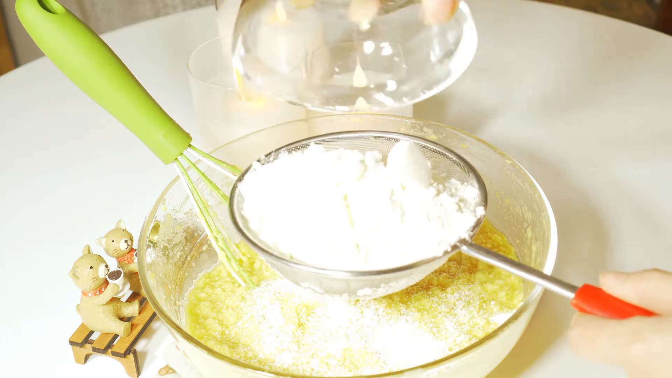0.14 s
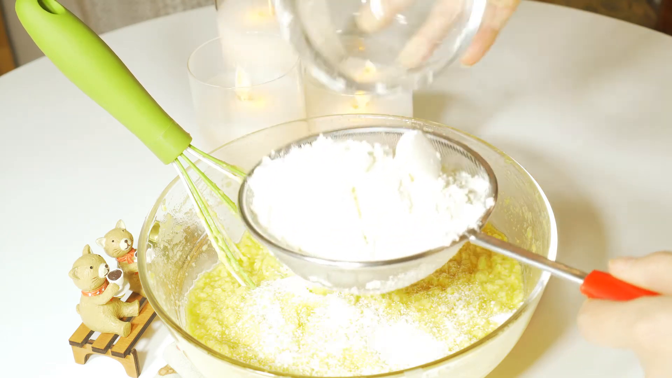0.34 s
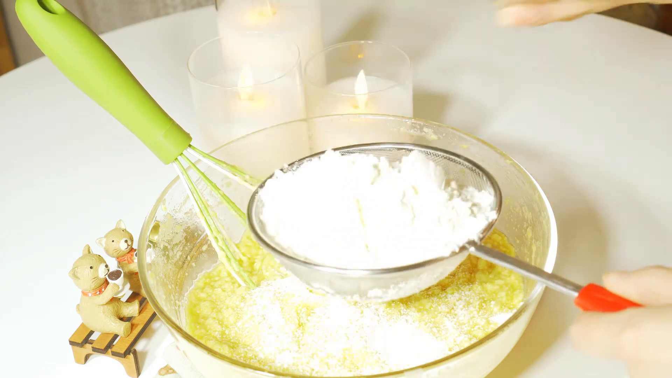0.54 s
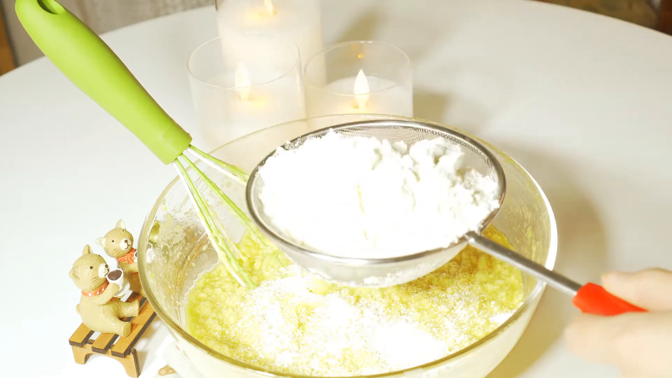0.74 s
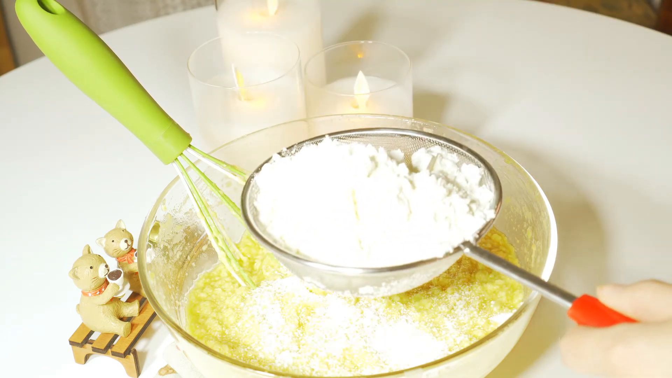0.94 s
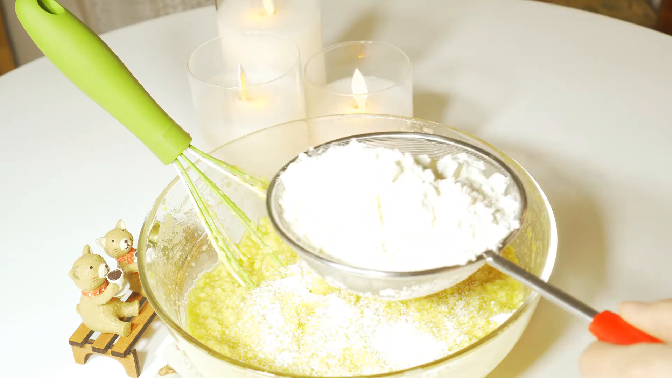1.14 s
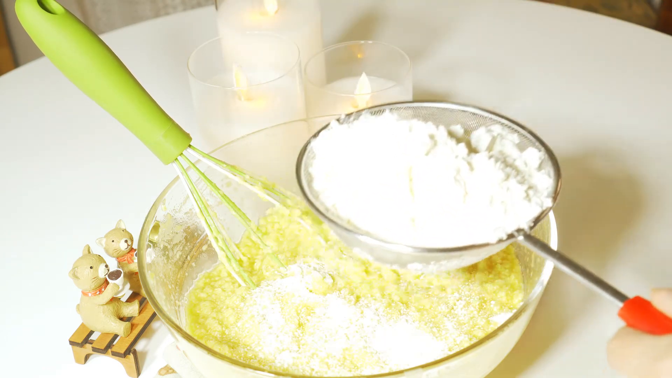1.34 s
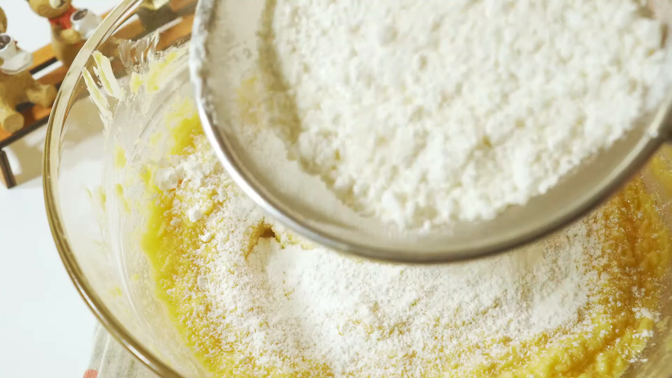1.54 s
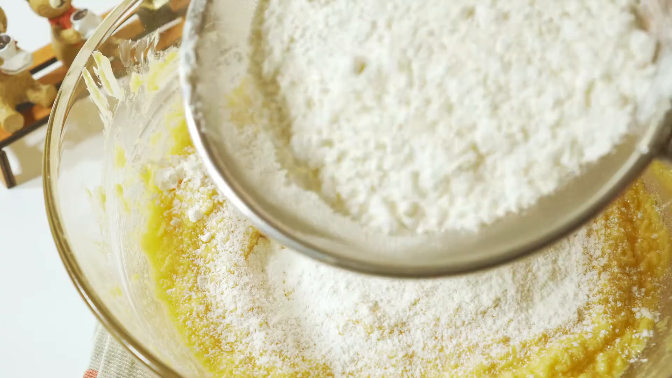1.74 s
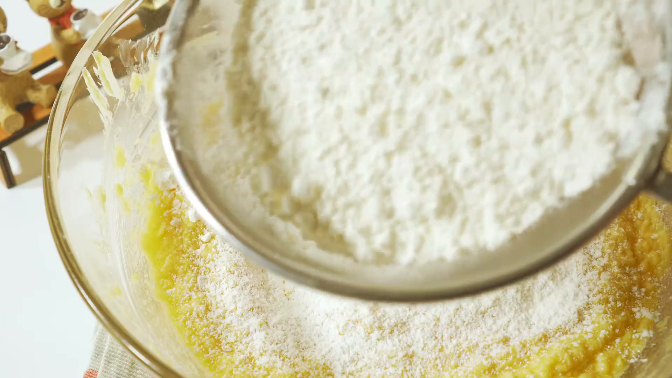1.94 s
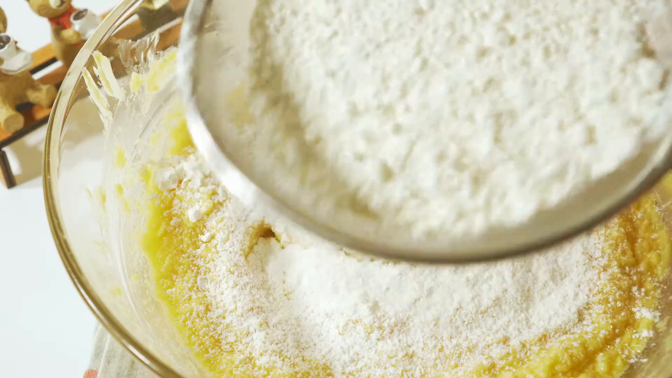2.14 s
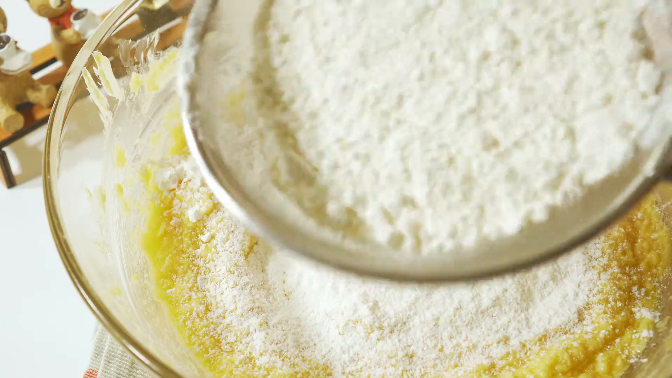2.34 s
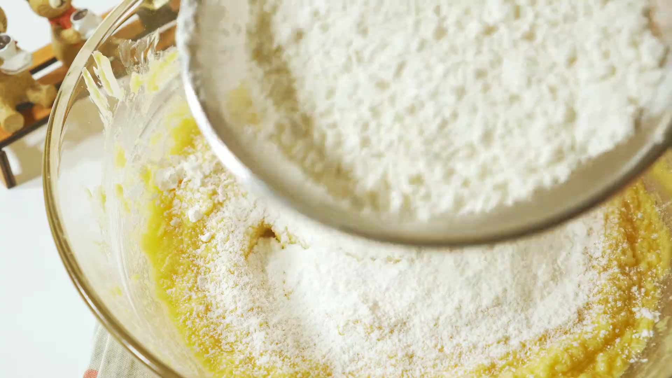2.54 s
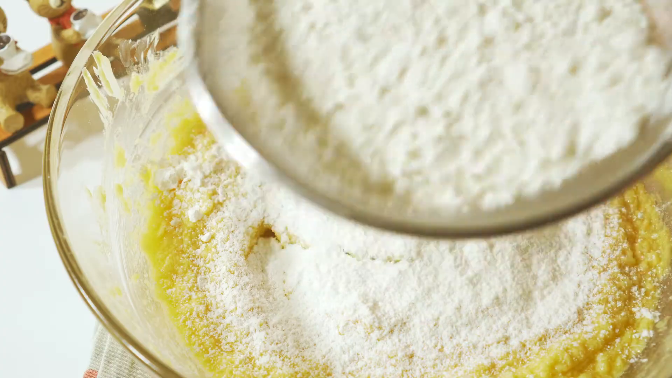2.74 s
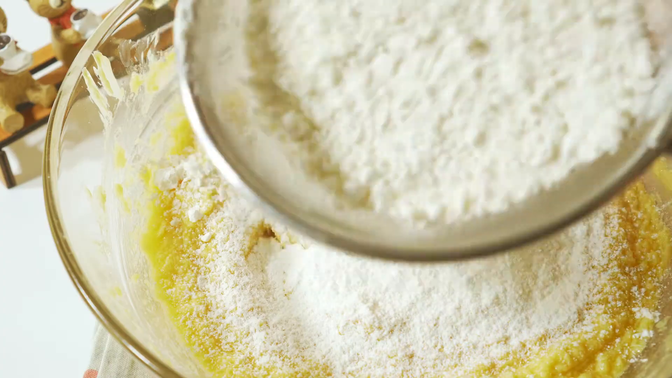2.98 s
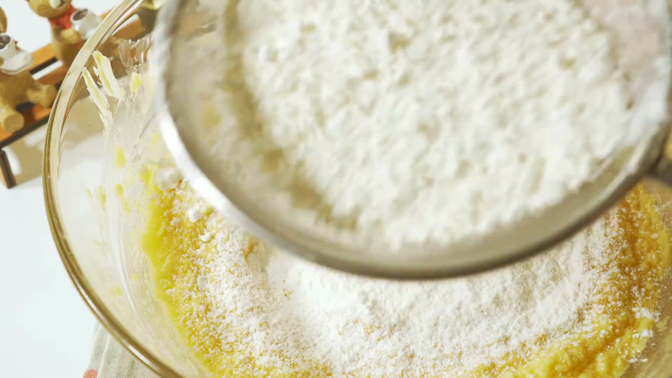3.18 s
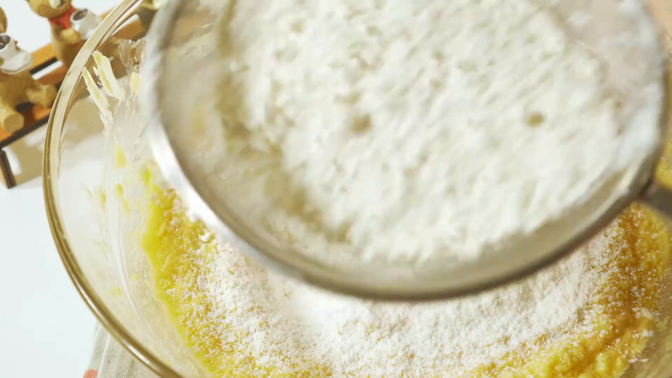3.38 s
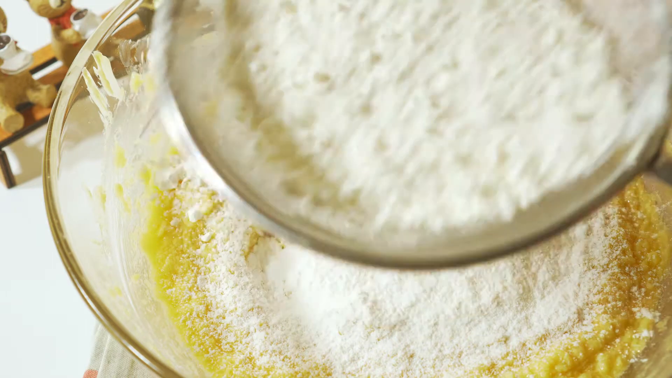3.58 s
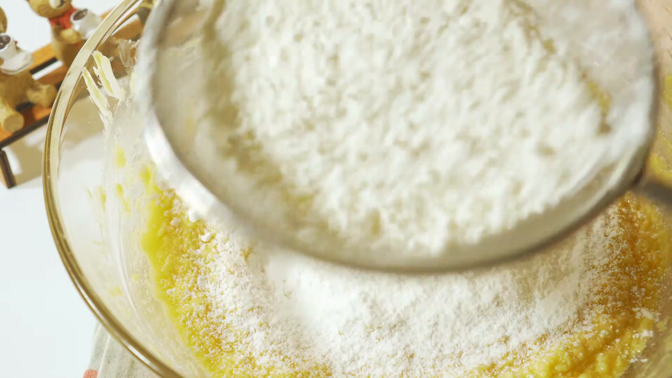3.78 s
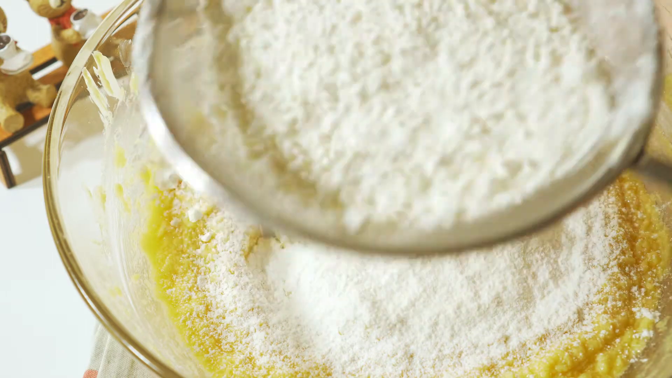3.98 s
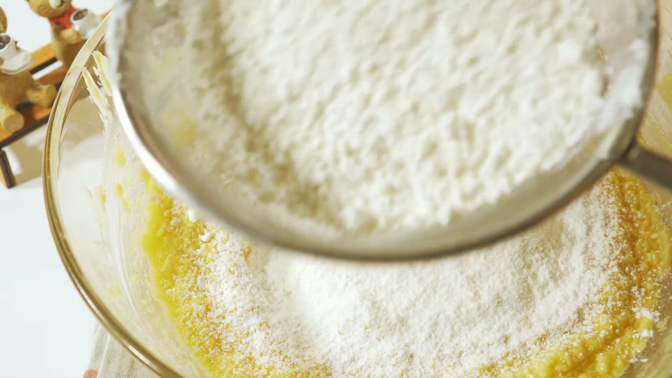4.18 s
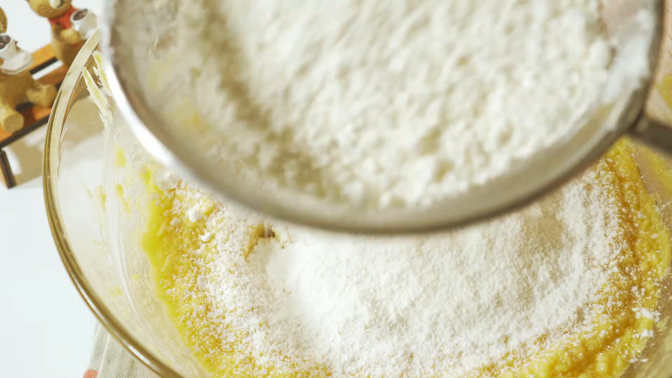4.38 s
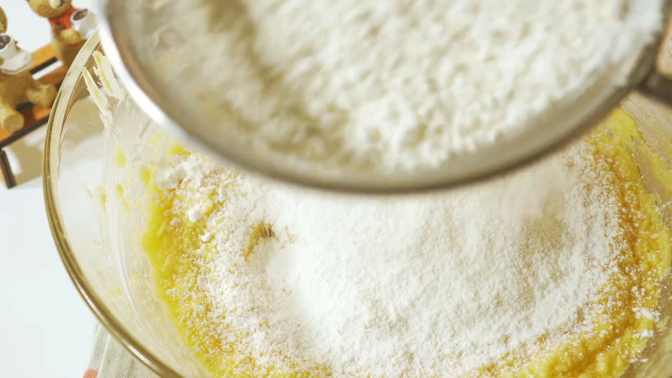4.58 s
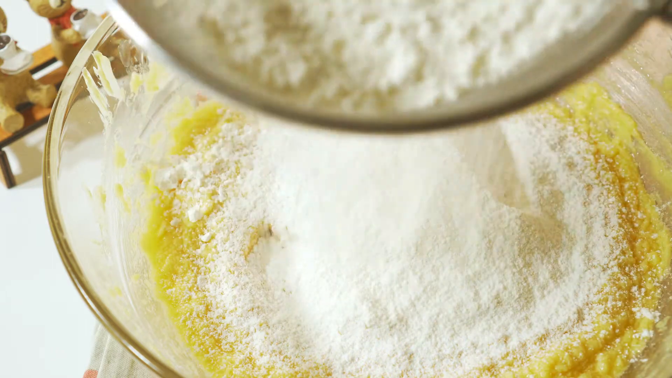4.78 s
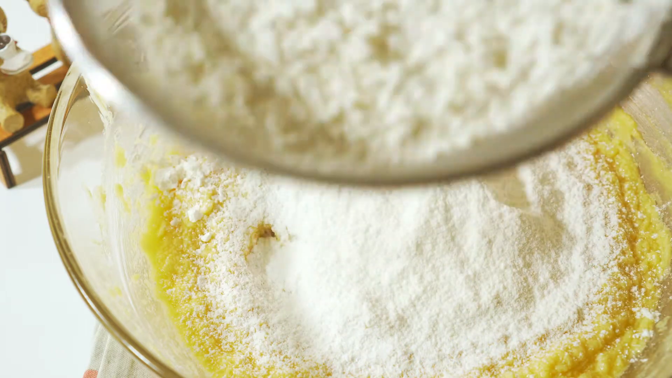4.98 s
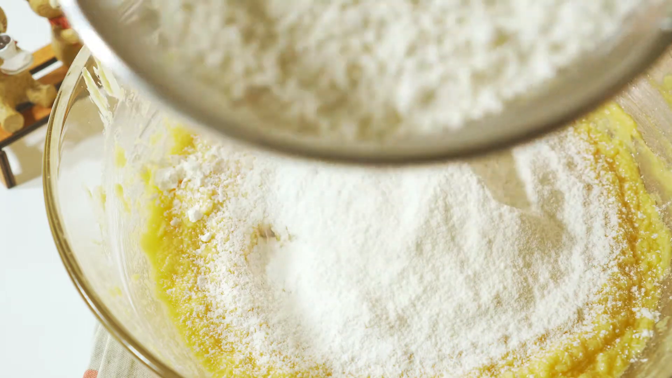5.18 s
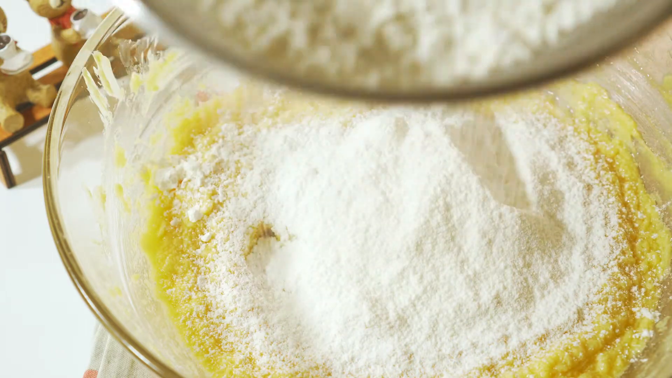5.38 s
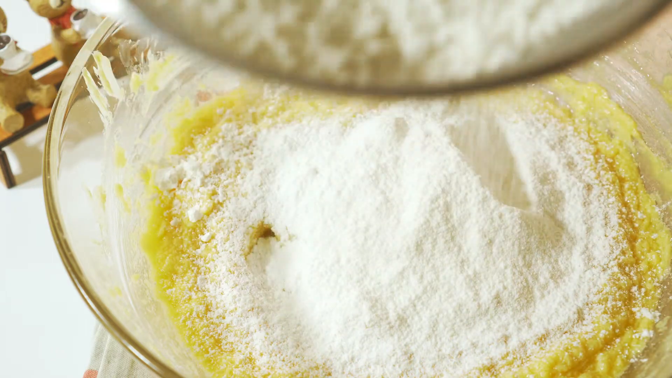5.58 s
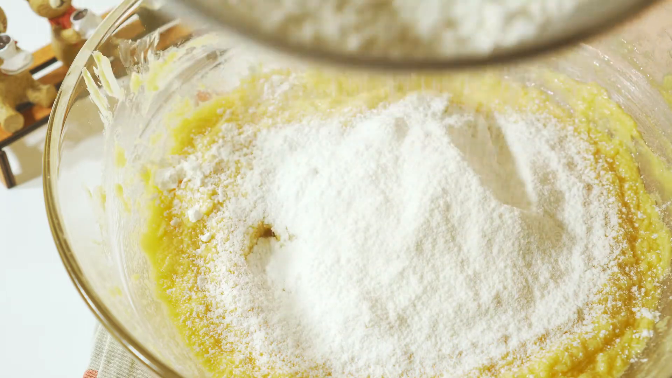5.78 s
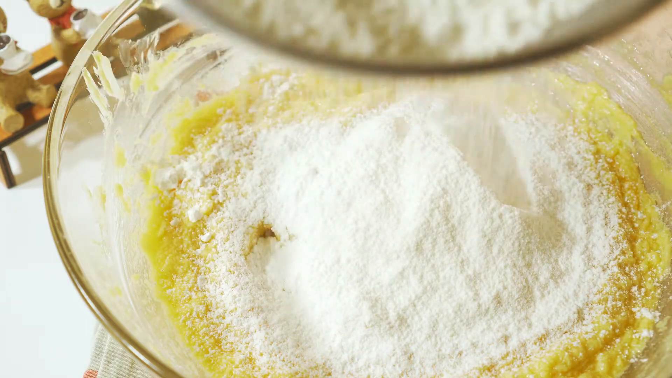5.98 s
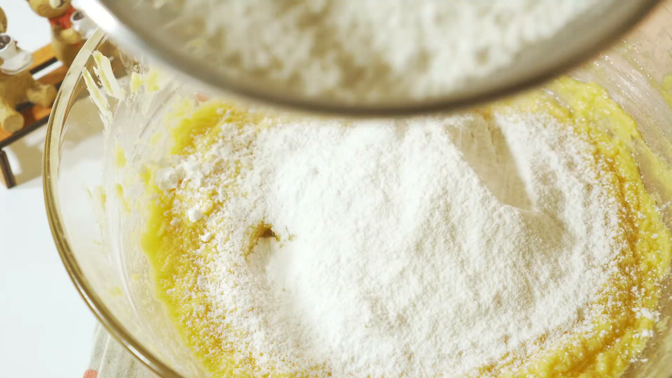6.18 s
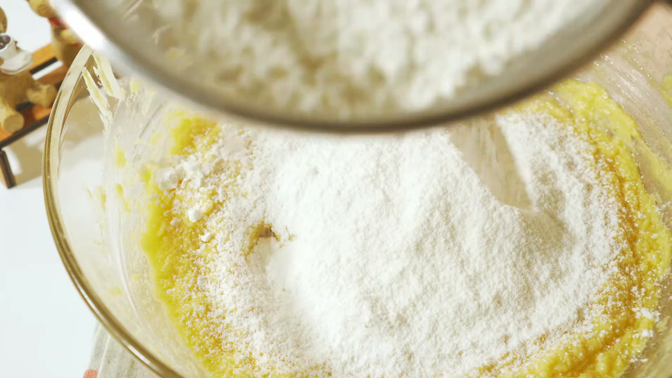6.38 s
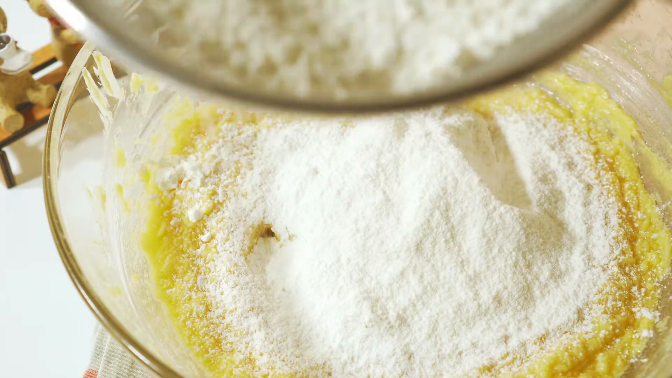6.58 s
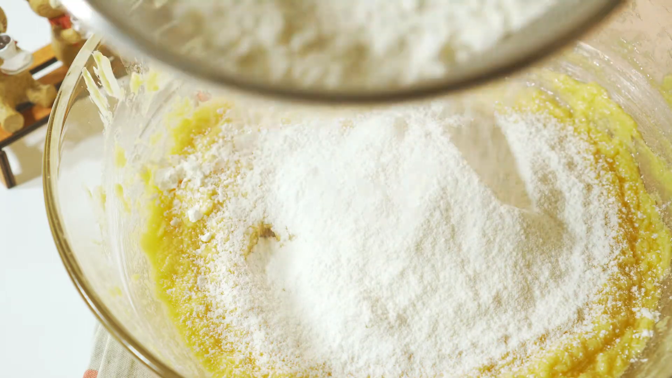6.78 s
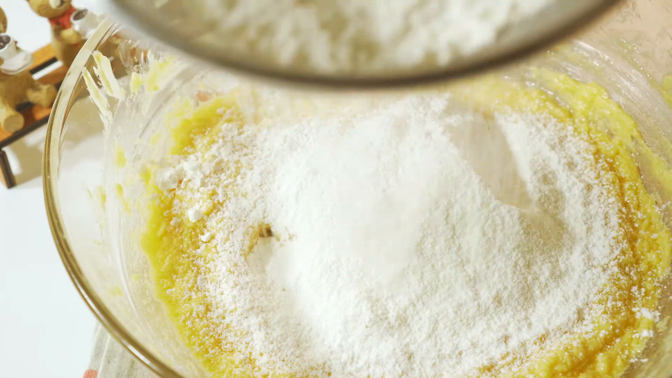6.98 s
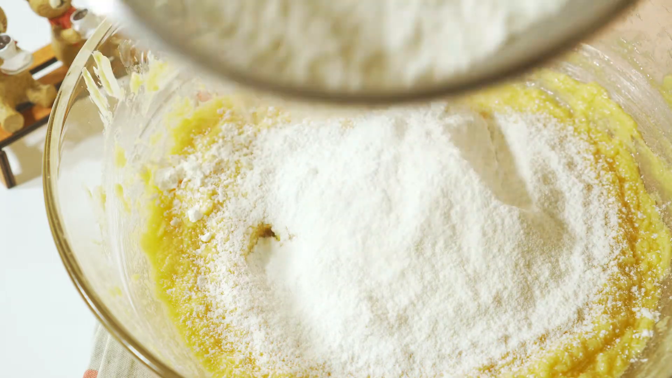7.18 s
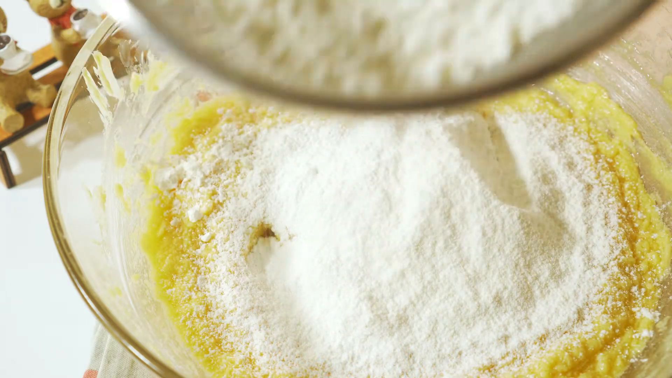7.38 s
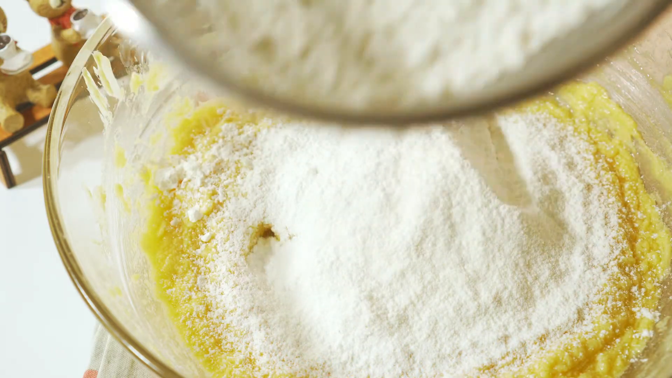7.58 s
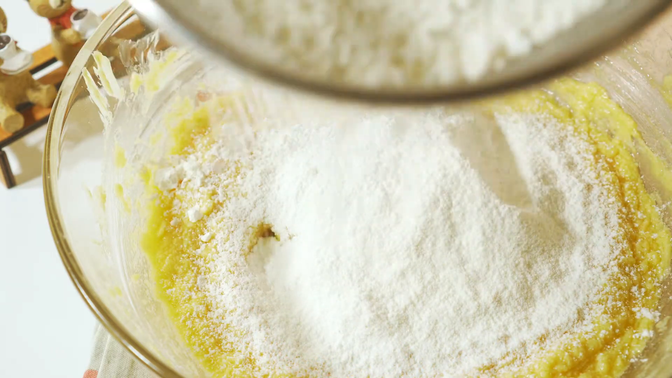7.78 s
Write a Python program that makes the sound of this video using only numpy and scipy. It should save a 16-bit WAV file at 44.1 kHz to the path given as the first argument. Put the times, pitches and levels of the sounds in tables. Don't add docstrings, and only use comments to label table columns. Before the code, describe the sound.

For a second and a half, a quiet kitchen: throbbing fridge compressor, small hand rustles, noticeable hiss. A brief silent cut with a tiny tick, then a palm taps a flour-laden metal sieve about five times a second to the end. Each tap is a dull low thud with a muffled rim knock and soft powdery puff. Very close microphone, strongly left, weak copy on the right.

```python
import sys
import numpy as np
from scipy import signal
from scipy.fft import rfft, irfft, next_fast_len
from scipy.io import wavfile
from scipy.ndimage import map_coordinates

SR = 44100
rng = np.random.default_rng(int(sys.argv[2]) if len(sys.argv) > 2 else 0)


def magnitude_from_level(level_db):
    exponent = np.asarray(level_db, float) / 20
    return 10 ** exponent


def put_to_file(sound):
    columns = np.atleast_2d(sound).T
    safe = np.clip(columns, -1, 1)
    whole_steps = np.round(safe * 32767)
    wavfile.write(sys.argv[1], SR, whole_steps.astype(np.int16))


N = 345303
T = np.arange(-3000, 3000) / SR
T_SHORT = T[1800:-1800]

# peak_s [s], thud_db
# [dB peak], thud_hz [Hz], puff_db [dB]
PALM_TAPS = [(1.5108, -11, 133, -38), (1.7119, -13, 104, -38), (1.8708, -10, 191, -38),
             (2.0573, -10.5, 114, -40.5), (2.226, -7.5, 135, -34), (2.4231, -5, 172, -36),
             (2.6156, -21.5, 80.4, -39), (2.806, -13.5, 172, -36), (3.0285, -26.5, 81, -38),
             (3.2289, -23.5, 106, -39.5), (3.4304, -6.5, 179, -40), (3.6356, -17, 91, -33.5),
             (3.8612, -9, 163, -35), (4.0691, -21.5, 77, -35.5), (4.2794, -18, 93.5, -33.5),
             (4.476, -5, 108, -32.5), (4.677, -5, 133, -33.5), (4.8839, -9.5, 150, -40),
             (5.0783, -8, 116, -35.5), (5.2598, -0.5, 158, -39), (5.4523, -5.5, 159, -42.5),
             (5.6691, -7.5, 98, -37.5), (5.8614, -10.5, 99, -35), (6.0618, -16, 116, -39.5),
             (6.2756, -13, 93, -38), (6.4845, -15.5, 107, -38.5), (6.6859, -11.5, 88.5, -34),
             (6.898, -9, 90, -35), (7.1032, -13.5, 85.5, -36), (7.3274, -17, 102, -35),
             (7.5377, -14.5, 79, -37), (7.7558, -11, 91, -32)]
ALL_TAPS = PALM_TAPS
# start_s [s], level_db [dB peak]
REBOUNDS = [(1.518, -9.5), (2.0621, -18), (2.2313, -4), (2.4306, -6.5), (2.6199, -27), (2.811, -14.5),
            (3.0297, -35), (3.2318, -29), (3.6391, -19.5), (4.072, -21), (4.2832, -17), (4.4802, -5.5),
            (4.6827, -13.5), (4.8864, -16), (5.0806, -4.5), (5.4622, -16), (6.075, -19), (6.4951, -19.5),
            (6.6873, -6.5), (6.9033, -5), (7.1067, -7.5), (7.3301, -8.5), (7.5396, -11.5), (7.7594, -6.5)]


def unit(x):
    return x / np.sqrt(np.mean(x ** 2) + 1e-20)


def curves(rows):
    s, *cols = np.transpose(rows)
    return np.array([np.interp(np.arange(N) / SR, s, c) for c in cols])


def shots(before, after):
    change_s = 1.475
    return np.where(np.arange(N) / SR < change_s, before, after)


def filtered(x, response):
    m = next_fast_len(N + 8192)
    spectrum = rfft(x, m) * response(np.fft.rfftfreq(m, 1 / SR))
    return irfft(spectrum, m)[..., :N]


def coloured(x, spectrum):
    f, db = np.transpose(spectrum)
    return unit(filtered(x, lambda hz: magnitude_from_level(np.interp(np.log(hz + 1), np.log(f), db))))


def grit(spiky_db):
    return rng.standard_normal(N) * magnitude_from_level(spiky_db * rng.standard_normal(N))


def wobble(rate):
    knots = rng.standard_normal(int(N * rate / SR) + 4)
    return map_coordinates(knots, [np.arange(N) * rate / SR])


def add(track, s, shape):
    start = round(s * SR) - len(shape) // 2
    part = track[max(start, 0):start + len(shape)]
    part += shape[max(-start, 0):][:len(part)]


def push(t, hz):
    u = (np.pi * hz * t) ** 2
    return (1 - 2 * u) * np.exp(-u)


def snap(t, hz):
    u = (np.pi * hz * t) ** 2
    return (1 - 3 * u) / (1 + u) ** 3


def burst(t, rise, fall):
    return np.exp(np.where(t < 0, t / rise, -t / fall))


def hump(t, width):
    return np.exp(-.5 * (t / width) ** 2)


def palm_taps():
    # pitch_hz [Hz], level_db [dB re thud], t60_s [s]
    frame_ring = [
        (442, -19.5, 0.059),
        (811, -26, .045),
    ]
    raised_s, raised_db = 4.6, -14
    cushion, cushion_s = 0.26, .006
    squeeze_db, squeeze_cycles, squeeze_hz = -18.5, 0.414, 262
    crack_db, crack_grows, crack_hz = -22, 1.14, 1140
    track = np.zeros(N)
    t = T_SHORT
    for s, db, hz, _ in ALL_TAPS:
        bony = np.clip(0.52 - 0.0057 * (hz - 100), 0, 1)
        if any(0 < back_s - s < cushion_s for back_s, _ in REBOUNDS):
            bony *= cushion
        contact = (1 - bony) * push(t, hz) + bony * snap(t, 1.32 * hz)
        add(track, s, magnitude_from_level(db) * contact)
        add(track, s + 0.001034, magnitude_from_level(crack_db + crack_grows * db) * snap(t, crack_hz))
        add(track, s - squeeze_cycles / hz, -magnitude_from_level(db + squeeze_db) * push(t, squeeze_hz))
        for ring_hz, ring_db, t60 in frame_ring:
            level = magnitude_from_level(db + ring_db + raised_db * (s > raised_s))
            decay = burst(t, 0.00094, t60 / np.log(1000))
            add(track, s, level * decay * np.sin(2 * np.pi * ring_hz * t))
    return track


def rim_bounces():
    track = np.zeros(N)
    for s, db in REBOUNDS:
        gap = min(s - tap[0] for tap in ALL_TAPS if tap[0] < s)
        hz = 159.3 * min(1, 0.0045 / gap) ** 1.02
        add(track, s, -magnitude_from_level(db) * (0.21 * push(T_SHORT, hz) + 0.88 * snap(T_SHORT, hz)))
    return track


def heap_landings():
    # start_s [s], level_db [dB]
    freedom = [
        (1.5, -2.5),
        (3, -1),
        (5, -8),
        (6.3, 0),
        (7.83, 2),
    ]
    track = np.zeros(N)
    t = T_SHORT
    for (s, db, _, _), luck in zip(ALL_TAPS, rng.random((len(ALL_TAPS), 5, 3))):
        wait, land, _ = luck[0]
        heap_db = .5 * db - 20.0 + np.interp(s, *np.transpose(freedom))
        fall = 0.48 * push(t - .007 - 0.0025 * land, 42)
        fall -= 0.56 * push(t + 0.01 - 0.016 * wait, 45)
        fall += 0.19 * push(t + 0.0131, 132)
        add(track, s + 0.02014, magnitude_from_level(heap_db) * fall)
        for late, pitch, size in luck[1:]:
            lump = (2 * size - 1) * snap(t, 35 + 90 * pitch)
            add(track, s + 0.00812 + .055 * late, magnitude_from_level(heap_db + 11.0 - 22.5 * late) * lump)
    return track


def rim_knock():
    # pitch_hz [Hz], width_hz [Hz], level_db [dB]
    rim_modes = [
        (471, 203, 5.5),
        (895, 274, 1),
        (1000, 100, 4),
        (1510, 425, -2.5),
    ]
    track = np.zeros(N)
    envelope = burst(T - .002, 0.0037, 0.003) + 0.18 * burst(T - .004, 0.00073, 0.031)
    for s, db, _, puff_db in ALL_TAPS:
        add(track, s, magnitude_from_level(puff_db + 11.5 + 0.46 * db) * envelope)

    def response(f):
        total = 0
        for k, (centre, width, db) in enumerate(rim_modes):
            mode = 1j * f * width / (centre ** 2 - f ** 2 + 1j * f * width)
            total = total + (-1) ** k * magnitude_from_level(db) * mode
        return total

    return track * unit(filtered(grit(spiky_db=3), response))


def flour_puffs():
    # pitch_hz [Hz], level_db [dB per Hz]
    puff_colour = [(500, 2), (1500, -3), (2500, 1), (4200, 0), (6000, -5.5), (9000, -5), (13000, -11.5),
                   (16000, -5.5)]
    track = np.zeros(N)
    envelope = 1.1 * burst(T - .0015, 0.0016, 0.0017)
    envelope += hump(T - .005, 0.0048)
    envelope += 0.32 * burst(T - .006, 0.0012, 0.028)
    for s, _, _, puff_db in ALL_TAPS:
        add(track, s, magnitude_from_level(puff_db - 4.0) * envelope)
    clumps = magnitude_from_level(1.8 * wobble(450) + 1.0 * wobble(150))
    return track * clumps * coloured(grit(spiky_db=-0.5), puff_colour)


def flour_slides():
    # middle_s [s], level_db [dB]
    swings = [(1.4416, -44.5), (1.6874, -48), (1.8534, -49.5), (2.0204, -50), (2.2114, -47), (2.402, -38.5),
              (2.591, -44), (2.7734, -46), (2.9724, -40.5), (3.1544, -52), (3.3674, -48.5), (3.5844, -43),
              (3.808, -39.5), (4.0214, -47), (4.225, -45), (4.43, -48), (4.643, -41), (4.8494, -49.5),
              (5.0014, -48.5), (5.2214, -51), (5.6044, -48), (5.8284, -48.5), (6.2154, -50), (6.4384, -53),
              (6.645, -46), (6.8586, -41), (7.0654, -46.5), (7.285, -46), (7.4894, -48.5), (7.707, -40.5)]
    # pitch_hz [Hz], level_db [dB per Hz]
    mesh_colour = [(200, -27), (700, 7), (1500, 2.5), (3000, -0.5), (4500, -0.5), (7000, -5), (12000, -9),
                   (16000, -10)]
    track = np.zeros(N)
    for s, db in swings:
        add(track, s, magnitude_from_level(db - 1.5) * hump(T, 0.0151))
    grain = magnitude_from_level(.7 * wobble(120) + 1.5 * wobble(700))
    return track * grain * coloured(grit(spiky_db=3), mesh_colour)


def rustles():
    # start_s [s], level_db [dB], pitch_hz [Hz], length_ms [ms]
    brushes = [(.345, -51.5, 4000, 32), (0.379, -36.5, 1360, 1.9), (.668, -42.5, 4600, 2),
               (0.885, -38, 3570, 2.6), (.935, -48.5, 1510, 33), (0.968, -36, 3600, 3.3),
               (2.853, -43, 1450, 4), (3.904, -45, 1290, 5.1), (5.348, -43.5, 1680, 20),
               (5.378, -47.5, 1260, 46), (3.263, -43.5, 1390, 4), (3.44, -42.5, 4450, 15),
               (2.445, -52, 3500, 12), (5.897, -37, 1250, 2.7), (6.525, -37, 347, 3.3),
               (6.732, -43, 1800, 2.8), (7.144, -49, 2500, 4), (1.502, -41.5, 5000, 5.2)]
    track = np.zeros(N)
    for s, db, hz, ms in brushes:
        band = signal.butter(2, [hz / 1.5, hz * 1.5], "band", fs=SR)
        noise = unit(signal.lfilter(*band, rng.standard_normal(len(T))))
        add(track, s, magnitude_from_level(db) * burst(T, ms / 5000, ms / 1000) * noise)
    return track


def compressor():
    throb_db = (-37, -48)
    track = np.zeros(N)
    stroke = 0.46 * push(T - .0045, 54) - push(T, 128)
    for s in np.arange(-.001, N / SR, 1 / 25):
        add(track, s, magnitude_from_level(0.69 * rng.standard_normal()) * stroke)
    return magnitude_from_level(shots(*throb_db)) * track


def room():
    rumble_db = (-48, -48.5)
    # pitch_hz [Hz], level_db [dB per Hz]
    rumble_colour = [(15, -25), (30, -4), (70, -4), (120, -2.5), (190, -5), (300, -10), (500, -16),
                     (900, -79)]
    # pitch_hz [Hz], level_db [dB per Hz]
    murmur_colour = [(200, -17), (400, -3.5), (800, -3), (1400, -4.5), (2100, -10.5), (3200, -10),
                     (6000, -16), (16000, -30)]
    # start_s [s], level_db [dB]
    activity = [(0.0, -55), (0.31, -52), (0.622, -50), (1.17, -48.5), (1.372, -50), (1.45, -55), (1.5, -56),
                (2.3, -56.5), (5.2, -57.5), (7.83, -56)]
    murmur_db, = curves(activity)
    rumble_gain = magnitude_from_level(shots(*rumble_db) + 1.2 * wobble(2.2))
    murmur_gain = magnitude_from_level(murmur_db + 1.7 * wobble(36) + 1.1 * wobble(200))
    rumble = rumble_gain * coloured(rng.standard_normal(N), rumble_colour)
    return rumble + murmur_gain * coloured(rng.standard_normal(N), murmur_colour)


def appliance_tones():
    # pitch_hz [Hz], level_db [dB rms], start_s [s]
    whines = [
        (964, -63, 1.5),
        (2987, -71, 0),
    ]
    seconds = np.arange(N) / SR
    track = np.zeros(N)
    for hz, db, s in whines:
        level = magnitude_from_level(db + 3 + 2.8 * wobble(15))
        phase = 2 * np.pi * hz * seconds + 1.8 * wobble(11) + 0.57 * wobble(40)
        track += level * np.sin(phase) * (seconds > s)
    return track


def recorder_hiss():
    # before_db [dB], after_db [dB]
    input_levels = [
        (-51, -54),
        (-59, -66),
    ]
    # pitch_hz [Hz], level_db [dB per Hz]
    hiss_colour = [(20, -16), (50, 2), (300, 4.5), (2000, -1), (6000, 1), (14000, 2.5), (16000, -1)]
    return np.array([magnitude_from_level(shots(*side)) * coloured(rng.standard_normal(N), hiss_colour)
                     for side in input_levels])


def scene():
    sieve = palm_taps() + rim_bounces() + heap_landings() + rim_knock() + flour_puffs()
    left = sieve + flour_slides() + rustles() + compressor() + room() + appliance_tones()
    right = filtered(left, lambda hz: magnitude_from_level(-19.7) * (1 - 24j / (hz + 12)) / (1 + 1j * hz / 14000))
    return np.array([left, right])


def dips_db():
    track = np.zeros(N)
    for _, (s, _, _, puff_db) in enumerate(ALL_TAPS):
        dip = min(0, 2 - 0.67 * (puff_db + 40)) * np.exp(-(T / 0.0042) ** 4)
        add(track, s - 0.014, dip)
        add(track, s + 0.013, .6 * dip)
    return track


def low_pass(x):
    return signal.sosfilt(signal.butter(12, 15870, fs=SR, output="sos"), x)


def record(dry):
    # start_s [s], level_db [dB]
    fade = [
        (0, 0.5),
        (1.450, 1),
        (1.459, -70),
        (1.474, -102),
        (1.493, -57),
        (1.502, 1),
        (7.83, 1),
    ]
    tick = np.zeros(N)
    add(tick, 1.481, magnitude_from_level(-39) * burst(T, .000012, .000012))
    x = (dry + recorder_hiss()) * magnitude_from_level(curves(fade))
    x = x * [magnitude_from_level(dips_db()), np.ones(N)]
    x = x + tick * magnitude_from_level([[0], [-12]])
    x = x / (1 + abs(x / 1.05) ** 5) ** (1 / 5)
    x = filtered(x, lambda hz: hz < 15800)
    return low_pass(x)


dry = scene()
out = record(dry)
put_to_file(out)
```